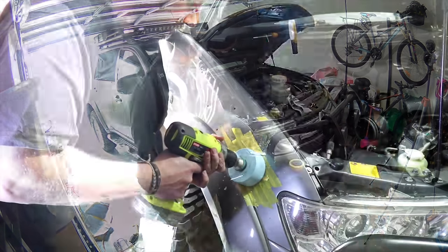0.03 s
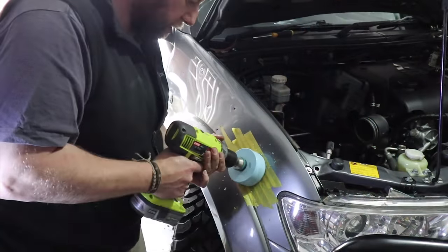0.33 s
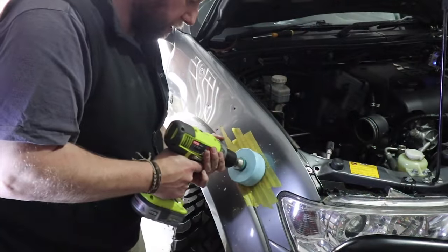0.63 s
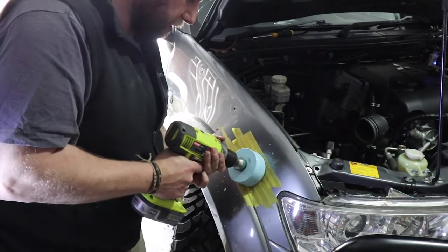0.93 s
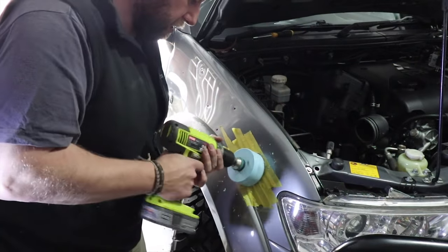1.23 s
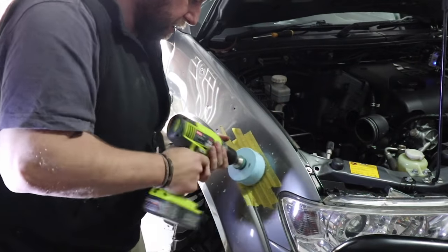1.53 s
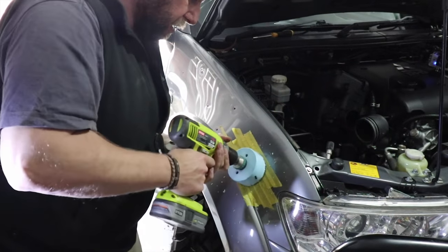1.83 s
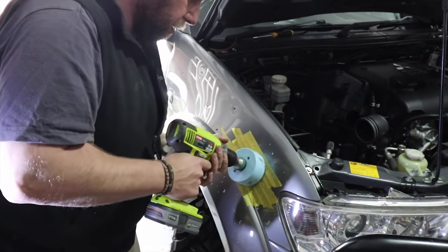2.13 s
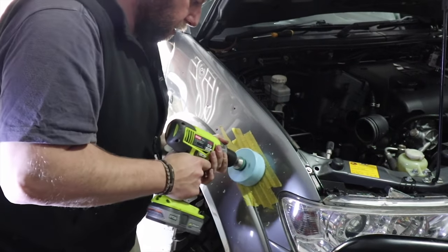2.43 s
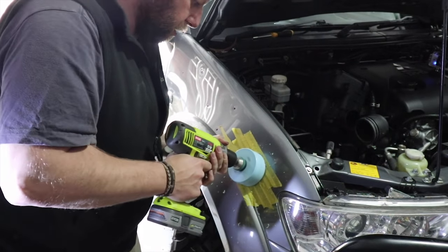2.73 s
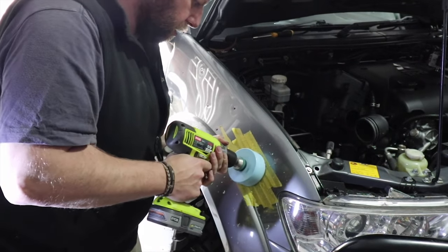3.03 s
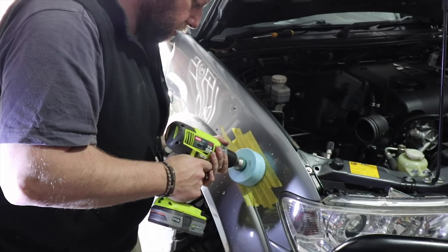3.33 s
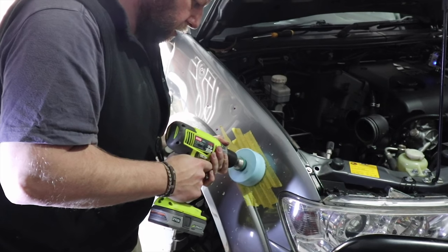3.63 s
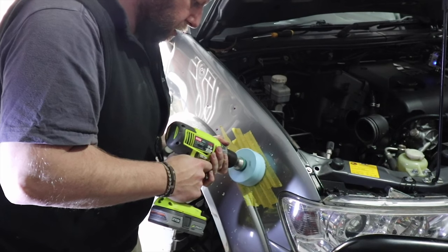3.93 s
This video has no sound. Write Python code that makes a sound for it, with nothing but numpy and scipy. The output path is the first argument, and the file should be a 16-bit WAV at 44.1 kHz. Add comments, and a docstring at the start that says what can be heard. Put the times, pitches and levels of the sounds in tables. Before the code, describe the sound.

A cordless drill drives a hole saw into a car's metal panel, whining and rasping close to the microphone in a garage. The saw binds several times and runs down, the trigger clicks, and the cutting resumes.

```python
"""A garage, one microphone close to a cordless drill driving a hole saw into a car's sheet-metal wing.
The teeth rasp and snag on the ringing panel while the motor whines and the gears rattle.
The saw binds four times and runs down, leaving faint room tone; the trigger clicks,
the motor controller squeals and the cut resumes."""
import sys
import numpy as np
from scipy import signal
from scipy.fft import rfft, irfft
from scipy.io import wavfile
from scipy.ndimage import uniform_filter1d

SR = 44100
rng = np.random.default_rng(int(sys.argv[2]) if len(sys.argv) > 2 else 0)


def wav_out(sig):
    """Save sig, one row per channel (or a flat mono array), as 16-bit PCM at SR to the path in sys.argv[1]."""
    wavfile.write(sys.argv[1], SR, np.round(np.clip(np.atleast_2d(sig).T, -1, 1) * 32767).astype(np.int16))


N = 176400
T = np.arange(N) / SR


def from_db(db):
    """Decibels to gain."""
    return 10 ** (np.asarray(db) / 20)


def unit_rms(x):
    """Scale to unit power."""
    return x / np.sqrt(np.mean(x ** 2) + 1e-20)


def curves(rows):
    """Each column of a timed table at every sample."""
    times, *columns = np.transpose(rows)
    return [np.interp(T, times, column) for column in columns]


def drift(rate_hz):
    """Random wander of spread 1, mostly slower than rate_hz."""
    hz = np.arange(N // 2 + 1) * SR / N
    return unit_rms(irfft(rfft(rng.standard_normal(N)) / (1 + (hz / rate_hz) ** 2), N))


def lift_db(hz, resonances):
    """Lift that a set of resonances gives at a frequency."""
    return sum(lift / (1 + (2 * (hz - centre) / width) ** 2) for centre, width, lift in resonances)


def colour(x, spectrum, resonances=()):
    """Causal filter with a broad spectrum and resonant lifts; white input keeps its power."""
    hz = np.arange(N + 1) * SR / (2 * N)
    knots_hz, knots_db = np.transpose(spectrum)
    db = np.interp(np.log(hz + 1), np.log(knots_hz), knots_db) + lift_db(hz, resonances)
    cepstrum = irfft(np.log(unit_rms(from_db(db))))
    cepstrum[1:N] *= 2  # fold to minimum phase
    cepstrum[N + 1:] = 0
    return irfft(rfft(x, 2 * N) * np.exp(rfft(cepstrum)))[:N]


def short_tones(rows):
    """Tones that swell and die within their length."""
    out = np.zeros(N)
    for start, length, hz, db in rows:
        swell = np.sin(np.pi * np.clip((T - start) / length, 0, 1))
        out += np.sqrt(2) * from_db(db) * swell * np.sin(2 * np.pi * hz * T)
    return out


# The whine, close up (time [s], level [dB])
WHINE_LEVELS = [(0,-23.5),(.065,-23),(.09,-29),(.2,-31),(.3,-24.5),(.82,-21),(1.2,-27.5),(1.27,-38),(1.33,-24),(1.4,-54),(1.45,-24),(1.52,-54),(1.575,-18),(1.63,-47),(1.9,-78),(2.13,-73),(2.2,-30),(2.3,-29),(2.51,-32),(2.535,-22.5),(4,-24)]
# Its octave, crying out as the motor is dragged down (time [s], level [dB])
OCTAVE_LEVELS = [(0,-32),(.58,-31),(.78,-31),(.97,-29),(1.28,-37),(1.35,-22.5),(1.39,-37),(1.61,-29.5),(1.69,-43),(1.9,-78),(2.13,-82),(2.29,-36),(2.6,-35),(4,-36.5)]
# The housing rings as the octave sweeps through (frequency [Hz], width [Hz], lift [dB])
HOUSING_MODES = [(3325,130,8),(4000,330,7)]
# Weaker motor tones in steady cutting (order [cycles per turn], level [dB])
MOTOR_ORDERS = [(8,-42),(16,-35)]
WHINE_ORDER = 9  # cycles per motor turn


def motor(whine_hz, motor_turns):
    """A fluttering whine, its octave and weaker orders, all smeared by the loose shaft."""
    def tone(order, backlash_turns=0.011):
        flutter = unit_rms(from_db(1.47 * drift(22) + 2.7 * drift(220)))
        shaft_turns = motor_turns + backlash_turns * drift(94)
        return np.sqrt(2) * flutter * np.sin(2 * np.pi * order * shaft_turns)
    whine = from_db(curves(WHINE_LEVELS)[0]) * tone(WHINE_ORDER, backlash_turns=0.0066)
    octave_db = curves(OCTAVE_LEVELS)[0] + lift_db(2 * whine_hz, HOUSING_MODES)
    octave = from_db(octave_db) * tone(2 * WHINE_ORDER)
    rattle_db = curves(GRIND_LEVELS)[0]
    running_db = rattle_db - np.median(rattle_db)  # the weaker orders follow the gears
    return whine + octave + sum(from_db(db + running_db) * tone(order) for order, db in MOTOR_ORDERS)


# Gears and chips, before trims and surges (time [s], rattle level [dB], hiss level [dB])
GRIND_LEVELS = [(0,-25.5,-34.5),(.5,-24,-34.5),(.88,-23,-31.5),(1.09,-23,-33),(1.13,-28.5,-36.5),(1.21,-26,-37),(1.26,-29,-42.5),(1.52,-29.5,-45.5),(1.68,-30,-44.5),(1.76,-44,-57),(1.86,-64,-70),(1.95,-64,-85),(2.125,-73,-84),(2.155,-35,-57),(2.21,-25,-41),(2.28,-23.5,-33.5),(3.1,-23.5,-34),(4,-25,-36.5)]
# Their colours at the microphone (frequency [Hz], relative level [dB])
RATTLE_SPECTRUM = [(900,-33),(1700,0),(2200,-0.5),(2700,3),(3400,1.5),(3900,-0.5),(4900,-2.5),(5500,-3.5),(6300,-11.5),(15000,-61.5)]
HISS_SPECTRUM = [(3500,-27),(5500,-14),(6600,3.5),(7400,-0.5),(8000,1.5),(9600,-0.5),(11000,1),(12500,-4.5),(14000,-7.5),(16000,-10)]


def grinding(motor_turns):
    """Gear rattle and chip hiss, gritty and throbbing with the motor."""
    rattle_db, hiss_db = curves(GRIND_LEVELS)
    throb = 1 + 0.039 * np.cos(2 * np.pi * motor_turns)
    grit = unit_rms(throb * from_db(0.98 * drift(360)))
    rattle = grit * rng.standard_normal(N) * from_db(rattle_db + 0.5 + 0.47 * surge_db())
    hiss = grit * rng.standard_normal(N) * from_db(hiss_db - 0.5 + surge_db())
    return colour(rattle, RATTLE_SPECTRUM) + colour(hiss, HISS_SPECTRUM)


def teeth(speed):
    """Force of uneven tooth bites, denser at speed, over smooth rubbing; held at even power."""
    bites = rng.random(N) < 1100 * (speed + .2) / SR
    sizes = from_db(1.5 * np.minimum(rng.exponential(1, N), 3)) * rng.choice([-1, 1], N)
    force = unit_rms(bites * sizes) + 0.75 * rng.standard_normal(N)
    return force / np.sqrt(uniform_filter1d(force ** 2, size=1500))


# The cut, before trims and swells (time [s], rumble level [dB], rasp level [dB])
CUT_LEVELS = [(0,-25,-17),(.2,-25.5,-21),(.55,-31.5,-19),(.7,-25,-18),(1.1,-27.5,-18),(1.27,-27.5,-21),(1.64,-25,-26.5),(1.72,-32.5,-22),(1.8,-41,-30.5),(1.94,-63,-57),(2.0,-67,-57),(2.02,-63,-42.5),(2.115,-64,-60.5),(2.2,-31,-24.5),(2.23,-22.5,-15),(2.35,-28.5,-17),(3.2,-24,-17.5),(4,-24,-19)]
# Its colours close to the wing (frequency [Hz], relative level [dB])
RUMBLE_SPECTRUM = [(30,-58),(50,-32),(75,-14.5),(115,-13),(155,2),(200,5.5),(250,1),(330,-13),(1300,-74)]
RASP_SPECTRUM = [(130,-24),(220,-16),(290,-1.5),(400,-0.5),(520,0),(750,-1.5),(880,-3.5),(1200,-4.5),(1350,-5),(1900,-10.5),(2600,-10),(5000,-25),(12000,-67)]
# Resonances of the panel and saw cup (frequency [Hz], width [Hz], lift [dB])
PANEL_MODES = [(97,20,1),(197.2,10.7,8.5),(322,44,3),(460.3,43.4,10.5),(540,19,4),(744,65,4.5),(1003,45,4.5),(1158,92,6.5),(1782,30,6)]


def panel(speed, saw_turns):
    """The wing rumbles and rasps under the teeth, harder once in every turn of the saw."""
    rumble_db, rasp_db = curves(CUT_LEVELS)
    force = teeth(speed)
    thud, clang = snags()
    swing_db = 1.28 * np.cos(2 * np.pi * saw_turns + 4.4)
    chatter_db = 3 * drift(24)
    low_force = force * from_db(rumble_db - 1 + swing_db + chatter_db) + thud
    mid_force = force * from_db(rasp_db - 1.5 + 0.59 * swing_db + 0.81 * surge_db()) + clang
    rumble = colour(low_force, RUMBLE_SPECTRUM, PANEL_MODES)
    rasp = colour(mid_force, RASP_SPECTRUM, PANEL_MODES)
    return rumble + rasp + groan(force * from_db(rumble_db), speed)


# The garage behind the drill (frequency [Hz], relative level [dB])
ROOM_SPECTRUM = [(25,-23),(80,9),(200,7),(500,4),(1500,-29),(5000,-21),(16000,-35)]


def room_tone():
    """Faint, low, steady noise of the garage."""
    return from_db(-53) * colour(rng.standard_normal(N), ROOM_SPECTRUM)


# Teeth snag on the panel (time [s], relative thud [dB], relative clang [dB], clang pitch [Hz])
SNAG_HITS = [(.06,-17,-24,476),(0.129,-23,-10,550),(0.474,-13,-37,496),(0.634,-10,-12.5,572),(.891,-12,-15,430),(.99,-9,-24,450),(1.097,-4,-11,316),(1.189,-4.5,-17,478),(1.479,-27,-12,455),(1.618,-16.5,-13,1010),
             (2.207,-20,-8.5,493),(2.795,-11.5,-31,497),(3.111,-8,-18,498),(3.239,-3,-13.5,433),(3.471,-6.5,-25,450),(3.55,-23,-11.5,454),(3.589,-19,-8,318),(3.869,-4.5,-17.5,453)]
SNAG_S, SLIP_HZ, CLANG_Q = 0.022, 195, 3.3


def snags():
    """Each snag is a short buzzing burst of force: a thud and a clang with a pitch of its own."""
    slip_hz = SLIP_HZ * (1 + .15 * drift(99.3))
    slips = np.diff(np.floor(np.cumsum(slip_hz) / SR), prepend=0)
    buzz = unit_rms(slips * from_db(4.5 * drift(200)))
    scrape = unit_rms(buzz + 1.23 * rng.standard_normal(N))
    thud, clang = np.zeros(N), np.zeros(N)
    for start, thud_db, clang_db, hz in SNAG_HITS:
        progress = np.clip((T - start) / SNAG_S, 0, 1)
        burst = np.sqrt(np.sin(np.pi * progress ** 0.61).clip(0)) * (progress < 1)
        ring = signal.iirpeak(hz, CLANG_Q, fs=SR)
        thud += from_db(thud_db) * burst
        clang += from_db(clang_db) * signal.lfilter(*ring, burst * scrape + 1e-18)
    return 0.25 * thud * buzz, 1.24 * clang


# The groaning panel (low edge [Hz], high edge [Hz], level against the driving force [dB])
GROAN_BANDS = [(89.9,106,-18.5),(277,356,2)]


def groan(force, speed):
    """Below 89% of full speed the teeth dig deeper and work the panel's low bands."""
    labour = np.clip((0.89 - speed) / 0.043, 0, 1)
    out = np.zeros(N)
    for low, high, db in GROAN_BANDS:
        band = signal.butter(2, [low, high], "band", fs=SR, output="sos")
        out += from_db(db) * signal.sosfilt(band, force) * np.sqrt(SR / 2 / (high - low))
    return labour * out


# The saw frees itself between binds (centre time [s], length [s], hiss lift [dB])
FREED_BITES = [(1.341,0.14,6),(1.458,0.071,10),(1.588,0.09,8.5),(1.685,0.03,8)]


def surge_db():
    """Swells of level while the freed saw bites again."""
    return sum(db * np.cos(np.pi * np.clip((T - centre) / length, -.5, .5))
               for centre, length, db in FREED_BITES)


# Brief notes from the metal (time [s], length [s], pitch [Hz], level [dB])
CATCH_NOTES = [(1.433,0.031,1160,-17),(1.474,0.033,305,-15),(2.238,0.049,300,-16.5),(2.36,.022,7300,-32)]


def catches():
    """The saw catches and the metal sings on one note."""
    return short_tones(CATCH_NOTES)


# Trigger and clutch, close up (time [s], level [dB])
TRIGGER_CLICKS = [(1.755,-27),(1.84,-45),(1.961,-43.5),(2.029,-55),(2.132,-42)]
# Their plastic colour (frequency [Hz], relative level [dB])
CLICK_SPECTRUM = [(500,-18),(1700,-8),(2500,8),(3300,-11),(4500,-4),(8000,-21),(16000,-20)]


def trigger(decay_s=0.0049):
    """Small plastic clicks, each a fast-dying burst of noise."""
    envelope = sum(from_db(db) * (T >= start) * np.exp(-np.abs(T - start) / decay_s)
                   for start, db in TRIGGER_CLICKS)
    return colour(envelope * rng.standard_normal(N), CLICK_SPECTRUM)


# Chirps at the restart (time [s], length [s], pitch [Hz], level [dB])
SQUEAL_NOTES = [(2.132,0.0063,4200,-38),(2.139,0.0064,5310,-42),(2.143,0.0087,4220,-33)]


def controller_squeal():
    """The motor controller squeals as the drill starts."""
    return short_tones(SQUEAL_NOTES)


# The motor's speed, heard as its whine (time [s], pitch [Hz])
WHINE_PITCH = [(0,2440),(.04,2447),(.08,2372),(.12,2500),(.165,2390),(.225,2510),(.27,2374),(.325,2350),(.385,2482),(.44,2373),(.53,2400),(.58,2204),(.645,2436),(.715,2330),(.745,2418),(.795,2390),(.825,2370),(.885,2497),(.917,2385),(.965,2492),(1.04,2372),(1.09,2455),(1.15,2347),(1.195,2450),
               (1.27,1802),(1.305,2204),(1.333,2280),(1.365,2015),(1.395,1490),(1.455,2164),(1.5,1700),(1.525,1667),(1.565,2306),(1.588,2396),(1.615,1869),(1.638,1420),(1.685,1746),(1.76,1086),(1.92,151),
               (2.13,150),(2.2,2250),(2.25,2310),(2.29,2590),(2.47,2690),(2.52,2578),(2.59,2578),(2.62,2546),(2.69,2545),(2.725,2503),(2.79,2558),(2.845,2515),(2.93,2544),(2.96,2519),(3.06,2543),(3.1,2508),(3.21,2526),(3.335,2486),(3.39,2516),(3.49,2470),(3.525,2503),(3.57,2443),(3.77,2490),(3.81,2433),(3.845,2515),(3.915,2440),(4,2477)]
FULL_SPEED_HZ, WHINE_CYCLES_PER_SAW_TURN = 2463, 255


def scene():
    """One motor speed drives whine, gears and saw; the same mono signal goes to both channels."""
    whine_hz = curves(WHINE_PITCH)[0] * (1 + 0.0025 * drift(30.8))
    cycles = np.cumsum(whine_hz) / SR
    motor_turns = cycles / WHINE_ORDER
    garage = room_tone()
    wing = panel(whine_hz / FULL_SPEED_HZ, cycles / WHINE_CYCLES_PER_SAW_TURN) + catches()
    drill = grinding(motor_turns) + motor(whine_hz, motor_turns) + trigger() + controller_squeal()
    mono = garage + wing + drill
    return np.array([mono, mono])


def record(dry):
    """The microphone chain rounds the peaks and cuts the top treble."""
    low_pass = signal.ellip(12, .1, 90, 15750, fs=SR, output="sos")
    return signal.sosfilt(low_pass, 1.262 * np.tanh(dry / 1.144))


dry = scene()
out = record(dry)
wav_out(out)
```